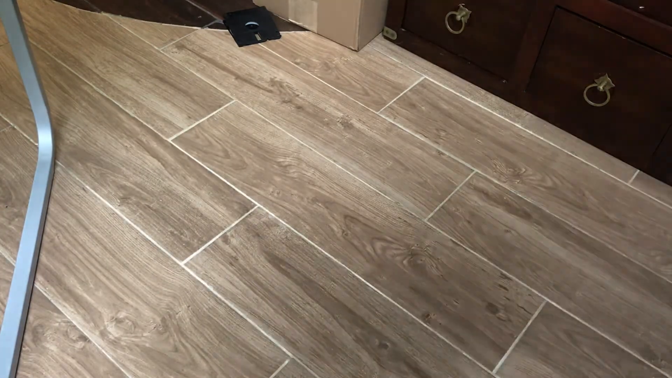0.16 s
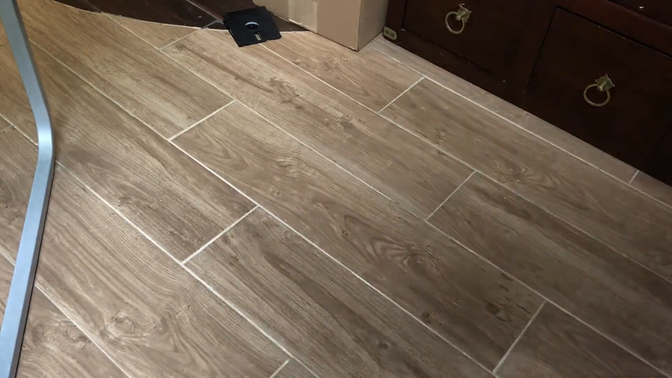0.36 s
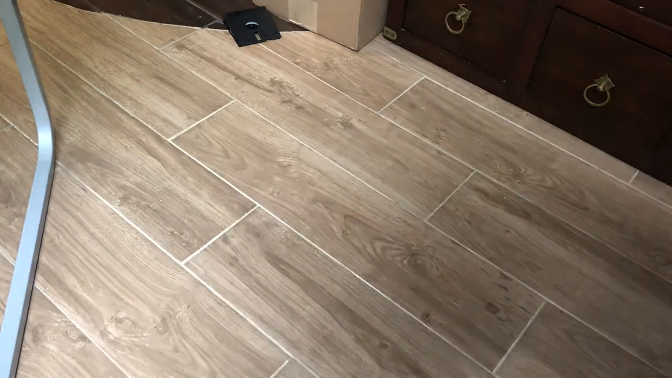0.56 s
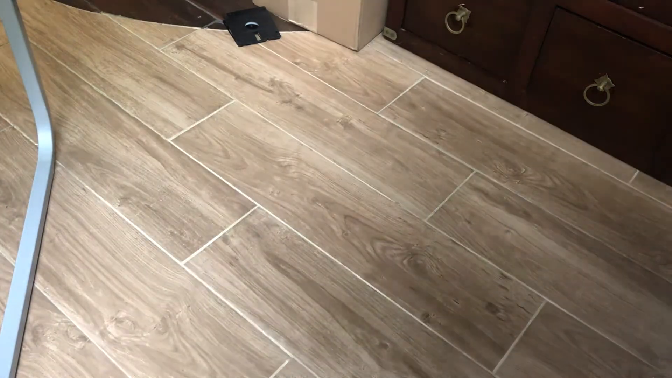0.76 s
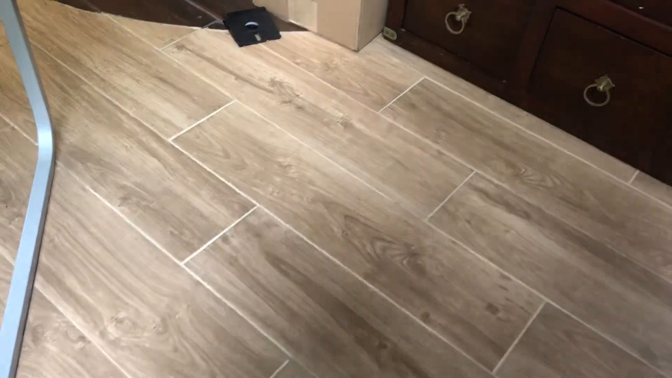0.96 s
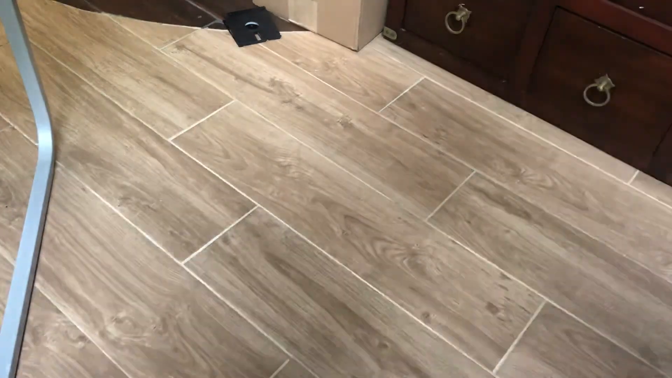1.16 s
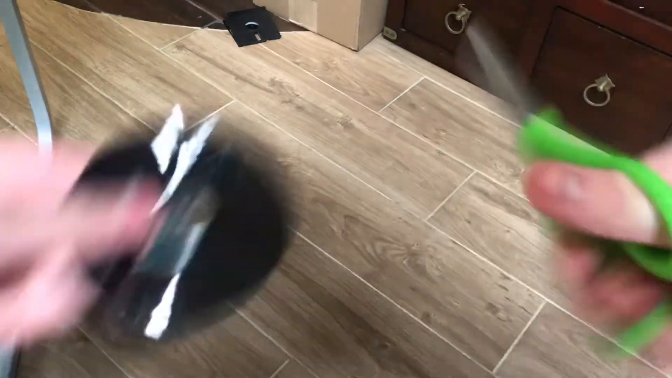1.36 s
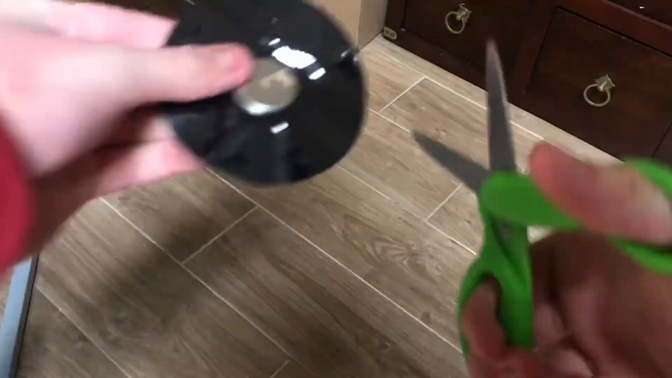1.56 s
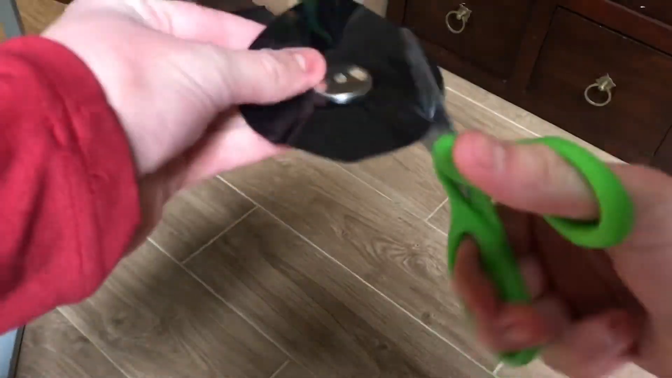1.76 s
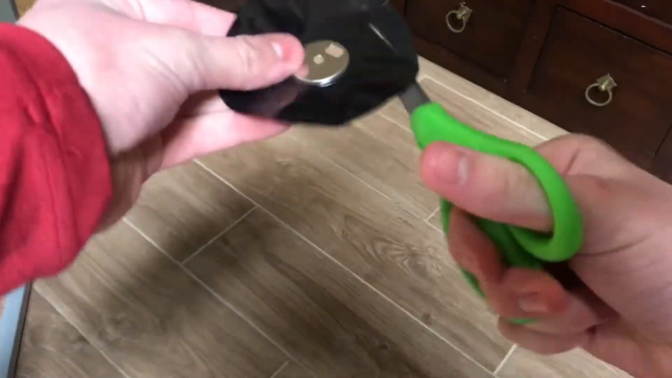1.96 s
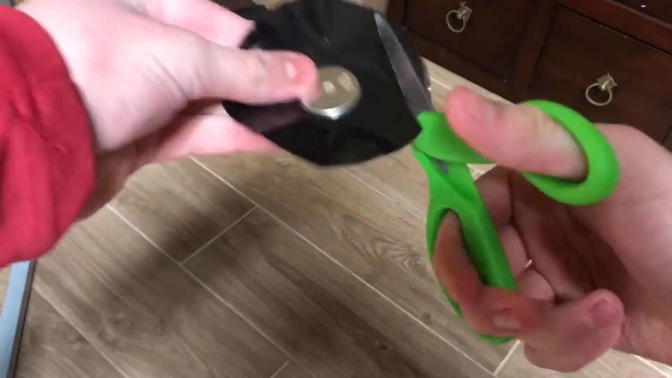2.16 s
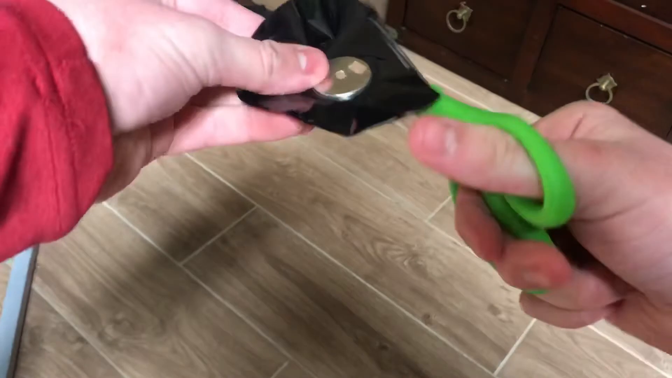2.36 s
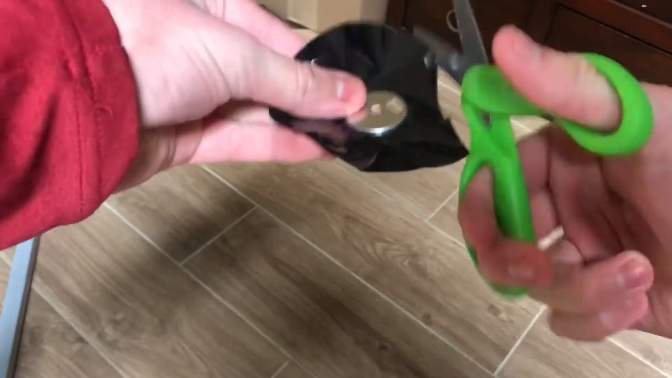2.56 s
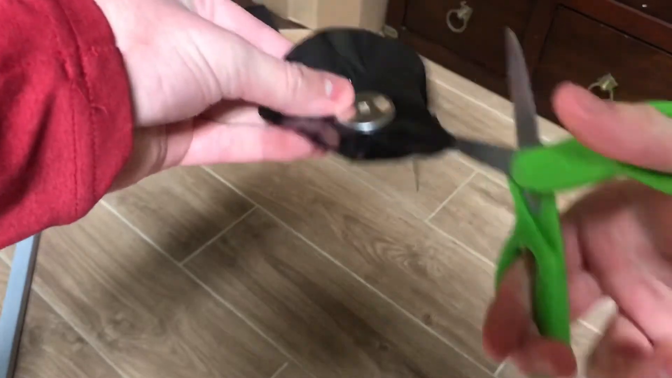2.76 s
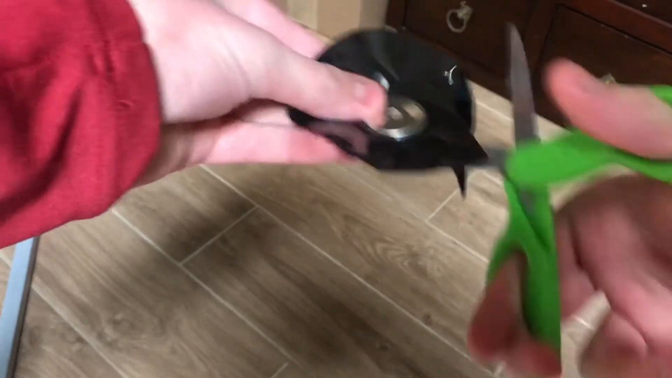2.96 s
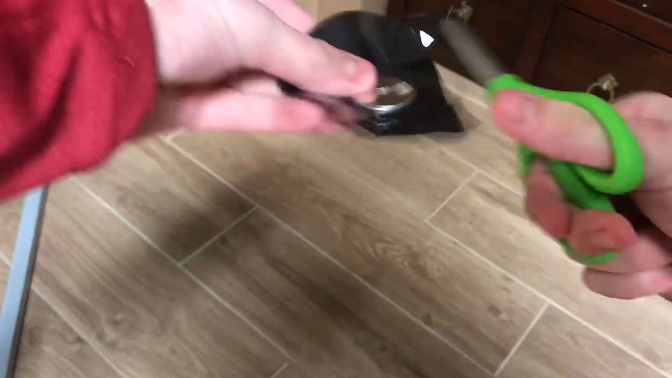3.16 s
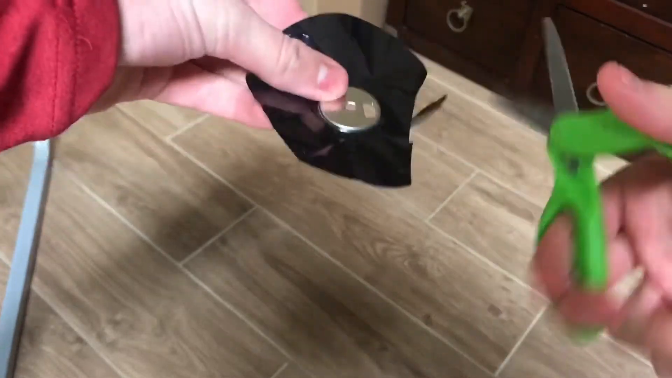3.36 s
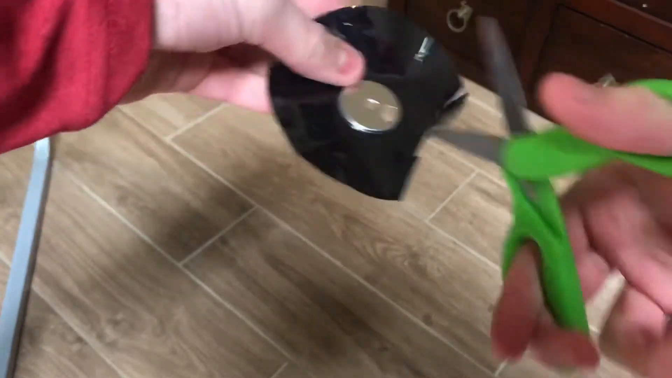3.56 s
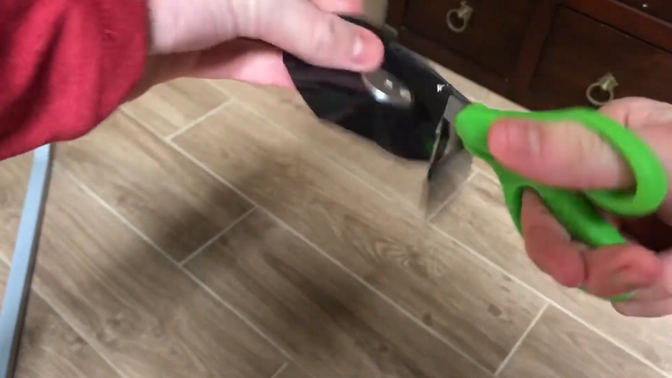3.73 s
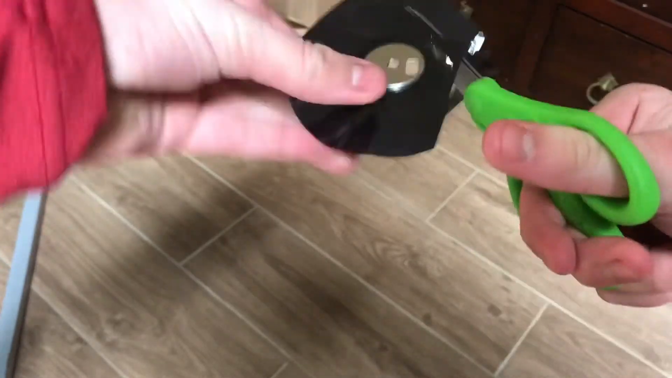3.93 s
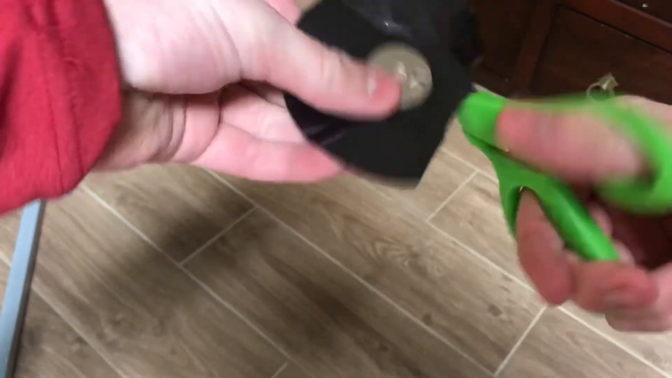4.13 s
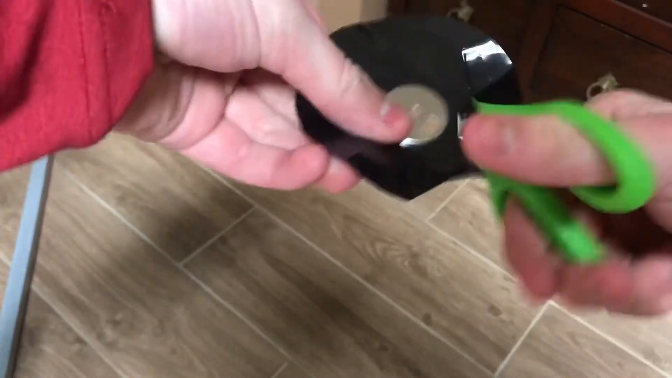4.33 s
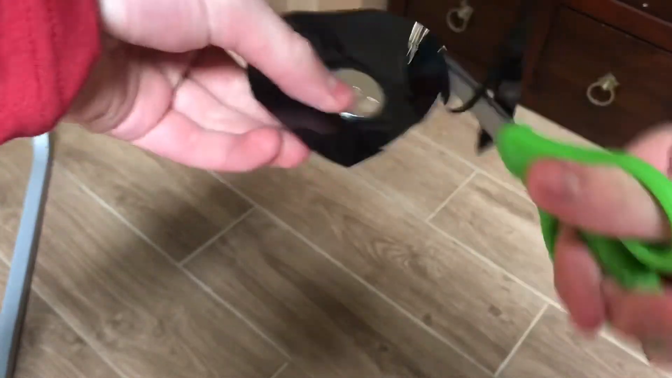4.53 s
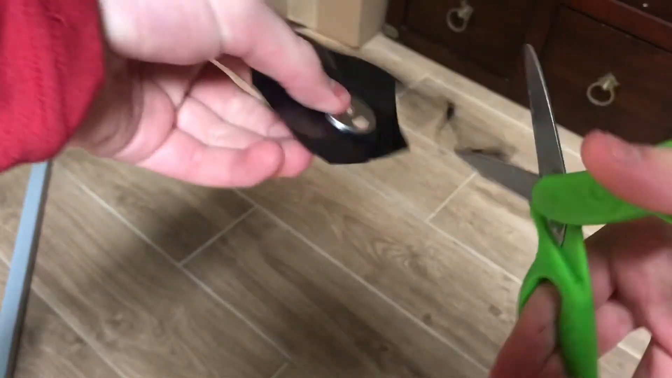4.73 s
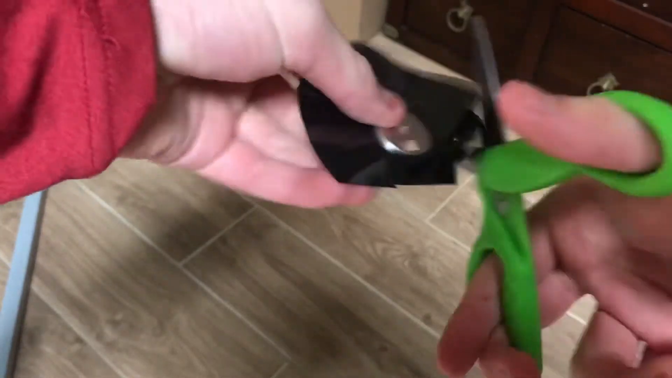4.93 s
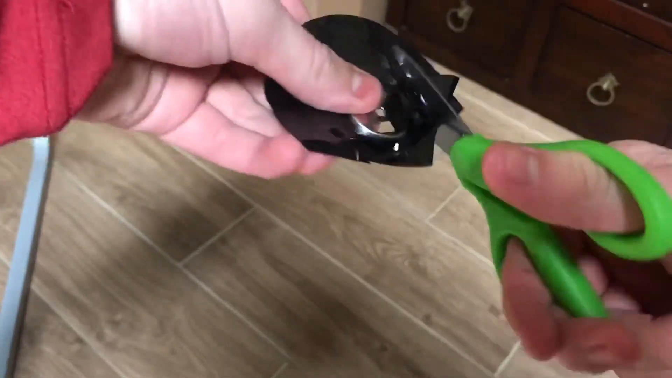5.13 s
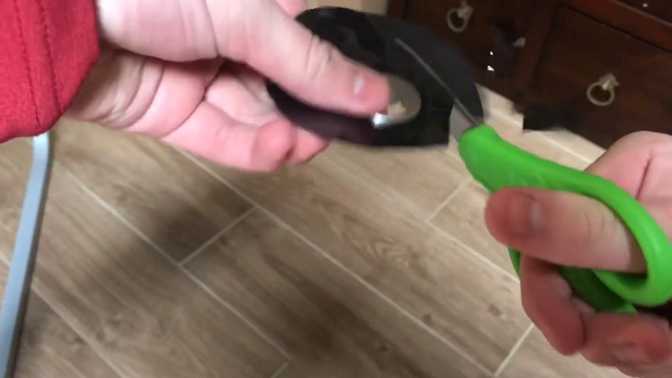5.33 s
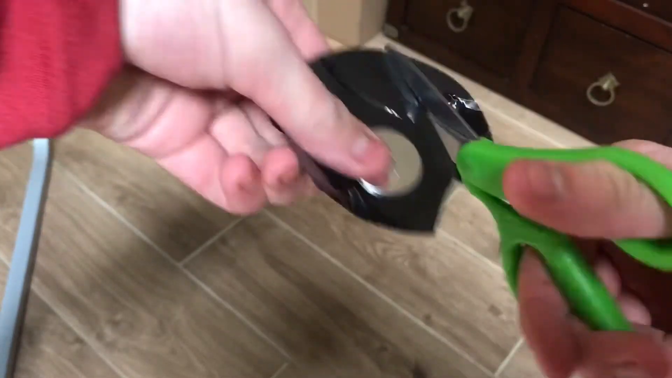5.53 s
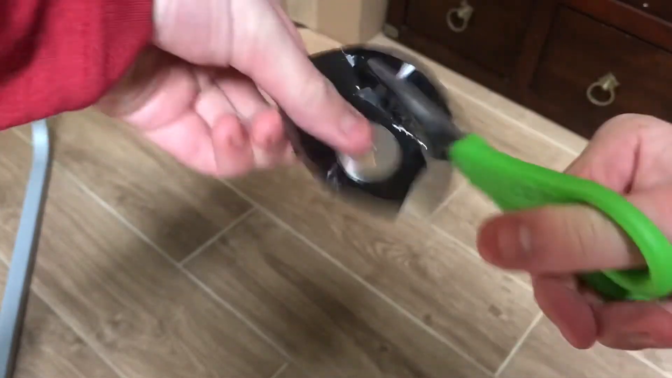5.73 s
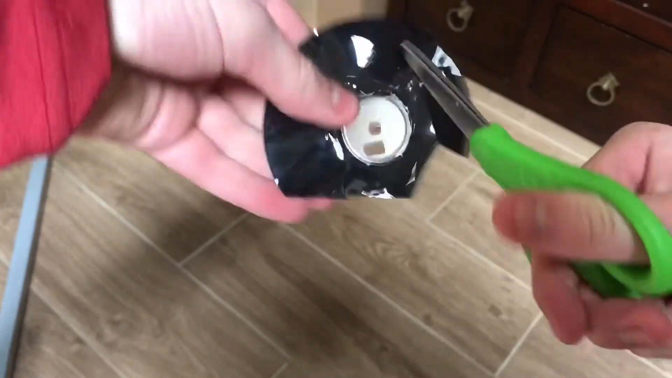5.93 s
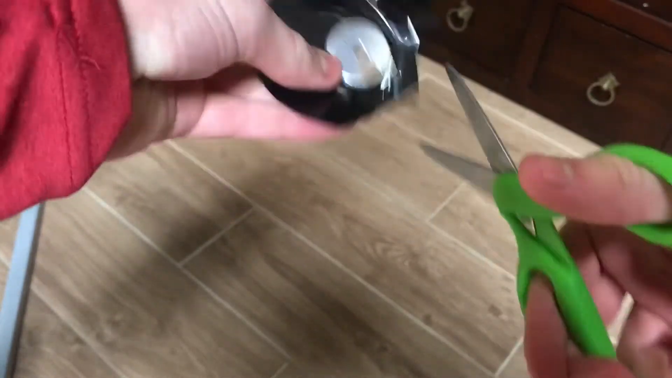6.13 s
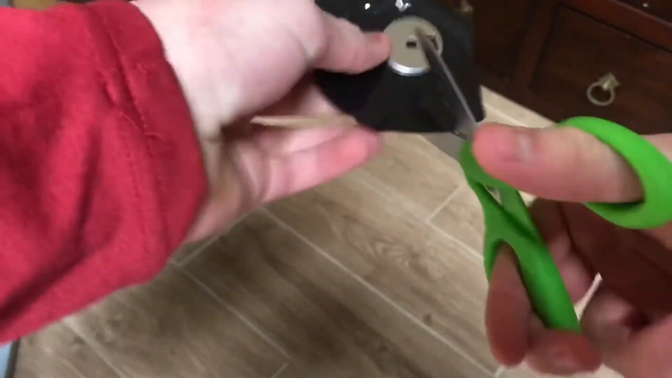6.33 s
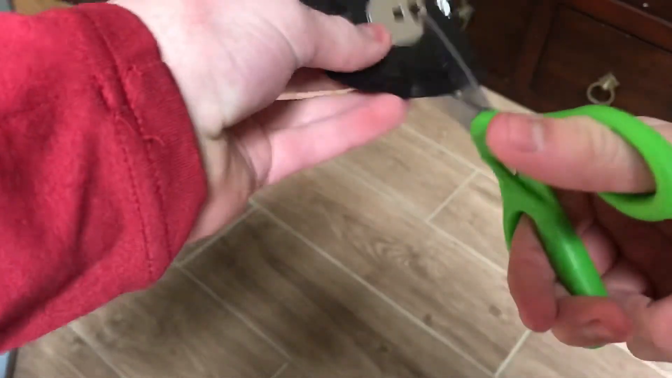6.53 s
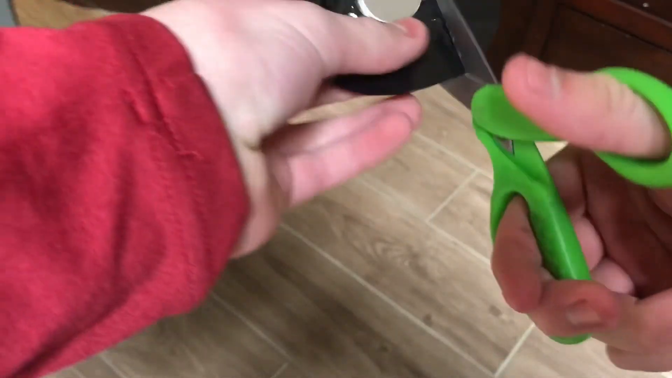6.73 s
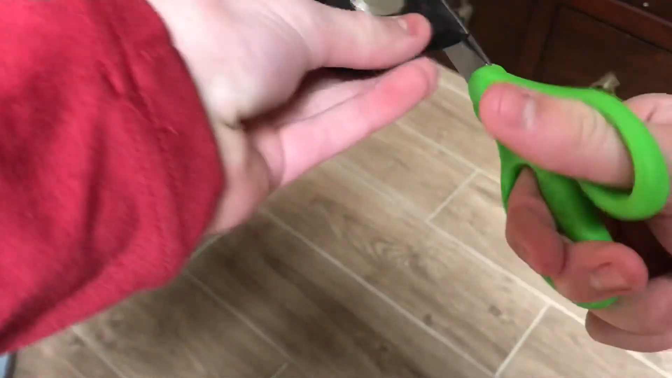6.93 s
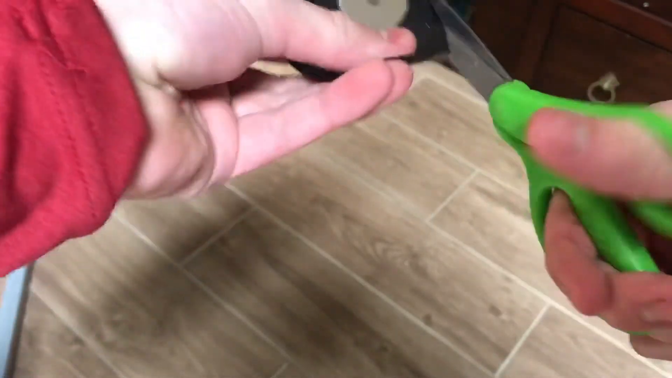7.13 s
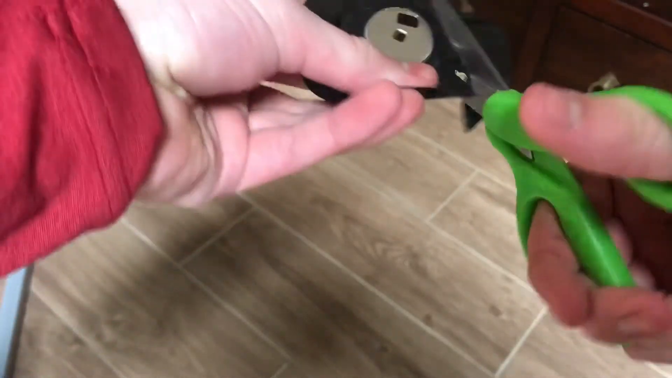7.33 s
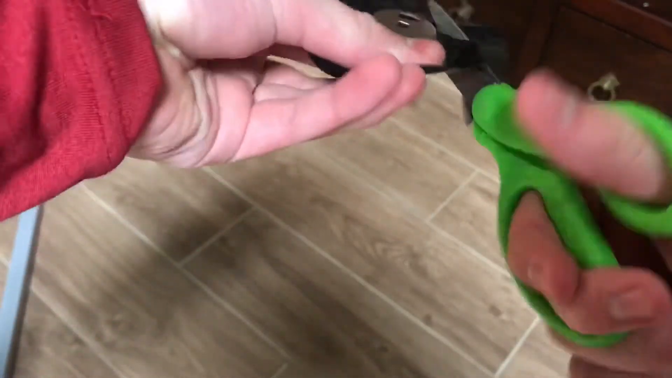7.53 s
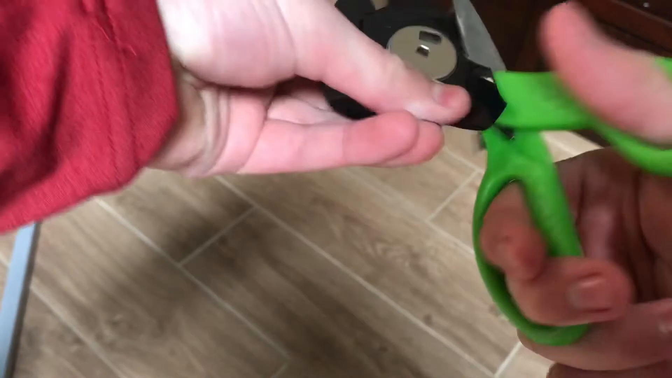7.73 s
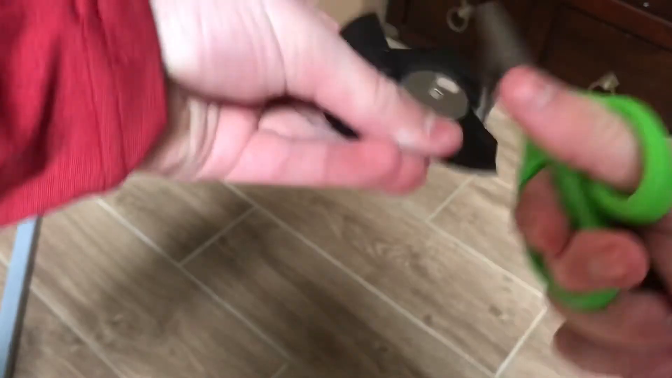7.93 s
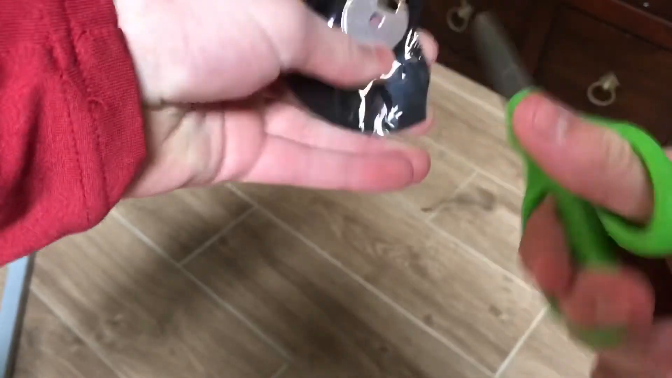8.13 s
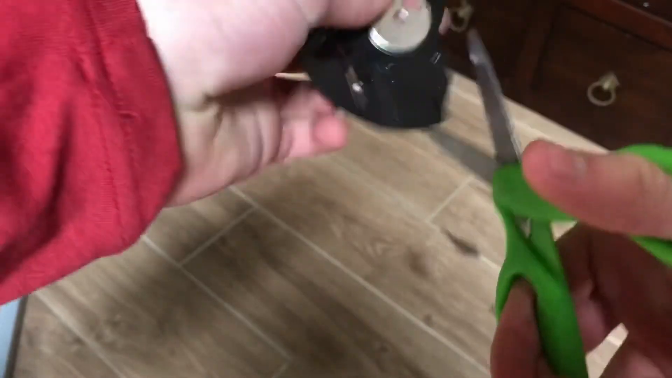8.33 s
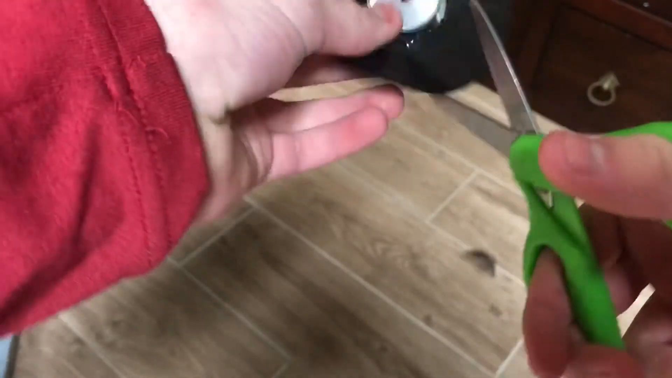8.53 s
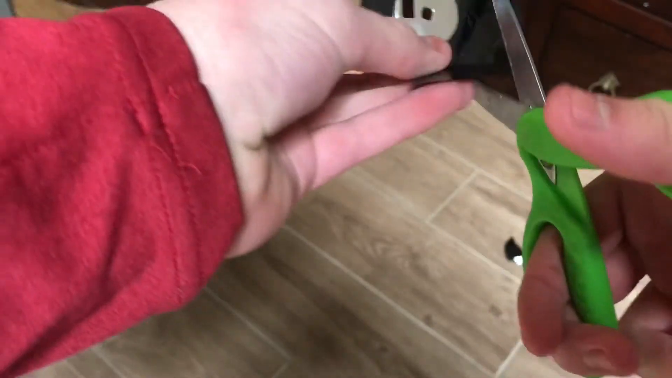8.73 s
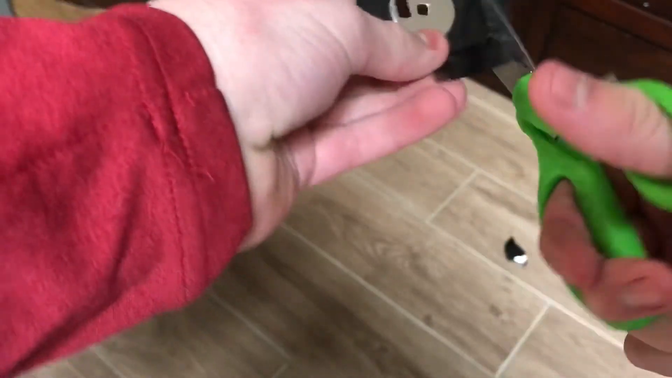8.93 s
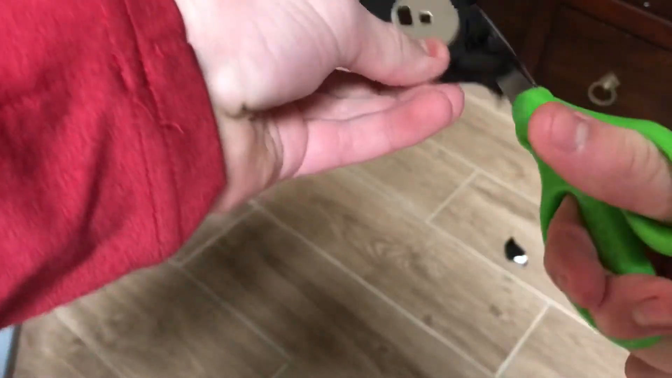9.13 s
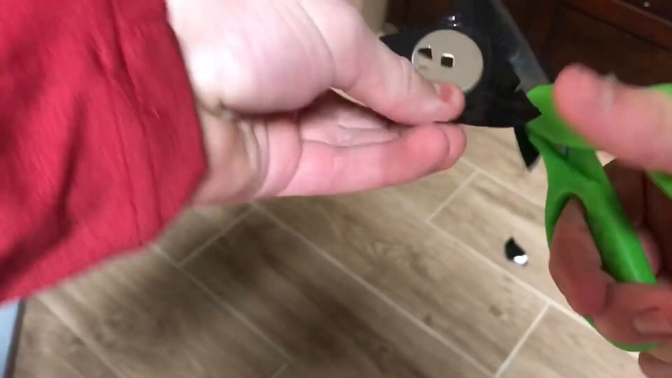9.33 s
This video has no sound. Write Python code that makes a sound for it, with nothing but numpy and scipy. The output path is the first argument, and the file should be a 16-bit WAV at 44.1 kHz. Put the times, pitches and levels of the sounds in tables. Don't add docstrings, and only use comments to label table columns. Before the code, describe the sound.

After a quiet second of faint hum and handle bumps, blades cut stiff plastic film in sharp, bright, crackling bursts with light rustle between.

```python
import sys
import numpy as np
from scipy import signal
from scipy.fft import rfft, irfft, next_fast_len
from scipy.io import wavfile
from scipy.ndimage import uniform_filter1d

SR = 44100
rng = np.random.default_rng(int(sys.argv[2]) if len(sys.argv) > 2 else 0)


def generate_wav(signal):
    frames = np.transpose(np.atleast_2d(signal))
    scaled = np.clip(frames, -1, 1) * 32767
    pcm = np.round(scaled).astype(np.int16)
    wavfile.write(sys.argv[1], SR, pcm)


def linear_from_db(decibels):
    return 10 ** (np.asarray(decibels, float) / 20)


N = 418068


def rms_one(x):
    return x / np.sqrt(np.mean(x ** 2) + 1e-20)


def at_hz(points, hz):
    table_hz, value = np.array(points).T
    return np.interp(np.log(hz), np.log(table_hz), value)


def band(x, low_hz, high_hz):
    gain = np.sqrt(SR / 2 / (high_hz - low_hz))
    sos = signal.butter(2, [low_hz, high_hz], "band", fs=SR, output="sos")
    return gain * signal.sosfilt(sos, x + 1e-18)


def coloured(x, points):
    size = next_fast_len(N)
    hz = np.maximum(np.arange(size // 2 + 1) * SR / size, 10)
    return irfft(rfft(x, size) * linear_from_db(at_hz(points, hz)), size)[:N]


def drift(rate_hz):
    knots = rng.standard_normal(4002)
    return np.interp(np.arange(N) / SR * rate_hz, np.arange(len(knots)), knots)


def ring(x, hz, width_hz):
    r = np.exp(-np.pi * width_hz / SR)
    push = np.array([1, 0, -1]) * np.sqrt((1 - r * r) / 2)
    return signal.lfilter(push, [1, -2 * r * np.cos(2 * np.pi * hz / SR), r * r], x)


def add(track, at, piece):
    end = min(len(track), at + len(piece))
    track[at:end] += piece[:end - at]


def crackle(size, spread_db):
    sizes_db = spread_db * np.minimum(rng.exponential(1, size), 4)
    return rms_one(rng.standard_normal(size) * linear_from_db(sizes_db))


def even(piece):
    spectrum = rfft(piece)
    humps = uniform_filter1d(np.abs(spectrum) ** 2, size=24) + 1e-30
    flat = irfft(spectrum * humps ** -.35)
    return flat * np.sqrt(np.sum(piece ** 2) / np.sum(flat ** 2))


def breaks():
    # start_s, flap_db, crack_db, spit_db
    snap_rows = [(1.3657, -26, -32, -47), (1.4, -18, -27.5, -33), (1.546, -30.5, -32, -38.5),
                 (1.75, -23.5, -39, -47), (1.795, -44, -17.5, -19.5), (1.805, -21.5, -61, -42.5),
                 (1.977, -31, -35, -43.5), (2.0476, -29, -30, -43), (2.07, -21.5, -16.5, -16.5),
                 (2.143, -27, -54, -25), (2.219, -33, -34, -22.5), (2.2681, -24.5, -23, -15.5),
                 (2.8127, -39.5, -36, -33), (3.0694, -19.5, -16.5, -15.5), (3.1338, -32, -24, -20.5),
                 (3.194, -25.5, -20, -14.5), (3.229, -25.5, -27, -30), (3.643, -34, -29.5, -42),
                 (4.9545, -34, -27.5, -26.5), (4.964, -57, -51, -28), (5.4671, -27, -26, -16.5),
                 (5.7253, -21.5, -17, -20), (5.8391, -29.5, -24, -24), (5.867, -36, -36.5, -44),
                 (6.631, -28.5, -24, -25), (6.8705, -21.5, -19.5, -14.5), (6.914, -34.5, -27.5, -20),
                 (7.8734, -23.5, -14, -15), (8.375, -29, -24.5, -32.5), (9.323, -40.5, -26.5, -28)]
    # start_s, flap_db, crack_db, spit_db
    pop_rows = [(1.266, -71, -29, -32), (1.632, -31, -29.5, -30.5), (1.8279, -13.5, -15.5, -12),
                (2.0111, -28.5, -24, -22.5), (2.0968, -29, -19, -21), (4.0502, -28.5, -33.5, -24),
                (4.1466, -24, -20, -42), (4.8015, -30, -38, -45), (5.2491, -26.5, -25.5, -40),
                (5.4824, -18, -20.5, -26), (5.549, -33.5, -32.5, -51), (5.588, -31.5, -30.5, -45),
                (5.612, -30.5, -24.5, -29), (5.629, -24, -21, -20.5), (5.771, -19, -15, -14.5),
                (5.9593, -31, -24.5, -19.5), (6.579, -32, -32, -35.5), (6.9049, -27.5, -20, -16.5),
                (6.931, -31, -29, -54), (7.0512, -51.5, -28, -32), (7.1457, -27.5, -20.5, -24),
                (7.4058, -35, -27.5, -20), (7.658, -55, -26, -32), (8.102, -23.5, -22, -22),
                (8.336, -41.5, -36.5, -35), (9.2016, -33.5, -30, -22), (9.362, -47, -32, -34),
                (9.38, -37, -28, -30)]
    # start_s, flap_db, spit_db, length_ms
    drawn_out_rows = [(1.7596, -24.5, -28, 5.6), (1.8173, -24.5, -32, 6.2), (1.855, -32, -34, 6.3),
                      (2.0785, -33.5, -53, 11), (2.4032, -33, -32.5, 7.1), (3.099, -30.5, -34.5, 4.6),
                      (3.7034, -27.5, -29.5, 9.1), (3.7341, -43, -39.5, 21), (4.14, -30, -31, 3.9),
                      (4.215, -28, -36.5, 5.3), (4.516, -35.5, -45.5, 12.2), (4.906, -32, -40, 15),
                      (4.9255, -36, -29, 7.9), (4.9395, -29.5, -28.5, 5.8), (5.066, -31.5, -47, 4.6),
                      (5.181, -25, -24, 8.1), (5.216, -29, -19.5, 11), (5.4476, -26, -27.5, 6.1),
                      (5.76, -27.5, -28, 6.4), (5.9752, -35.5, -27, 3.4), (6.844, -22.5, -23, 4),
                      (6.9779, -33, -31.5, 6.4), (7.27, -29.5, -33, 8.6), (7.623, -51, -39.5, 6.7),
                      (7.65, -47, -34.5, 5.4), (7.8323, -37, -26.5, 11), (8.3711, -21.5, -42, 3.7),
                      (8.9681, -29, -26, 5.5), (9.0015, -33.5, -24.5, 13.4), (9.473, -32, -21, 2.2),
                      (9.4775, -39, -41.5, 3.3),
                      (1.2706, -33, -64, 5.1), (1.715, -39, -50, 7.7), (2.168, -36, -44, 7.5),
                  (2.4956, -41.5, -41.5, 8), (2.6963, -49.5, -49, 13), (2.9898, -50, -38, 15),
                  (3.0116, -37, -39, 8), (3.566, -43, -42.5, 6.5), (3.762, -31.5, -45, 6.5),
                  (3.7791, -39.5, -34.5, 5.9), (4.502, -49, -42, 7), (4.111, -39, -77, 4.3),
                  (4.333, -44, -44, 13), (4.6964, -47.5, -68, 7.1), (4.7442, -39, -49, 3.3),
                  (5.148, -44.5, -39, 17), (5.6896, -41, -39, 12), (5.9352, -38.5, -43, 8.3),
                  (6.452, -47.5, -65, 8.1), (6.755, -28.5, -50, 3.1), (7.356, -45, -45, 11.3),
                  (7.7791, -39, -42.5, 4.4), (8.453, -47.5, -45, 17), (8.6591, -43, -43.5, 16),
                  (8.861, -39.5, -51, 10.4), (8.889, -46, -33, 11), (9.162, -50, -46, 22),
                  (9.407, -48.5, -40.5, 16), (9.427, -48, -42, 17)]
    # start_s, flap_db, spit_db
    tick_rows = [(0.562, -59, -54), (6.413, -51, -66), (6.49, -65, -66), (6.433, -49, -67),
                 (0.926, -54, -49), (2.043, -39, -41), (4.314, -43, -50), (8.117, -42, -65),
                 (8.183, -47, -53), (8.872, -50, -44), (8.944, -41, -54), (0.971, -45, -51),
                 (1.523, -44, -63), (1.455, -50, -49), (1.792, -19, -56), (1.962, -38.5, -73),
                 (2.2498, -41, -44), (2.273, -24, -14.5), (2.959, -49, -46), (3.364, -55, -42.5),
                 (3.4547, -35, -46), (3.4964, -37.5, -75), (3.9738, -45, -40.5), (4.021, -38, -53),
                 (4.259, -52, -46), (4.389, -45, -51), (6.109, -43, -101), (6.152, -39.5, -60.5),
                 (6.3199, -44.5, -37.5), (6.726, -39.5, -55), (6.761, -35, -96), (6.84, -25, -33),
                 (7.458, -38, -39), (7.5526, -45, -38.5), (7.613, -53, -37), (8.059, -54, -41.5),
                 (8.806, -33.5, -42.5), (8.839, -39.5, -41)]
    pop_ms, snap_ms, tick_ms = 3.08, 4.3, 4.37
    sharp = [(*row, pop_ms) for row in pop_rows] + [(*row, snap_ms) for row in snap_rows]
    folds = drawn_out_rows + [(*row, tick_ms) for row in tick_rows]
    return sharp + [(s, flap, (flap + spit) / 2 + 1.78, spit, ms) for s, flap, spit, ms in folds]


def snaps():
    flap, crack, spit = np.zeros((3, N))
    t = np.arange(2048) / SR - .006
    lead_s = .0059
    for s, flap_db, crack_db, spit_db, ms in breaks():
        length = max(ms - 1.2, .4) / 1000
        slow = np.clip((ms - 3.) / 10.0, 0, 1.5)
        creak = linear_from_db(-42.5 + 9.2 * slow) * np.clip(1 + t / 0.023, 0, 1) ** 2
        rise = creak + np.clip(t / (0.00017 + 0.45 * slow * length), 0, 1) ** 1.37
        accent_db = 4.64 * np.exp(-np.abs(t - .0003) / 0.00029) - 3.5
        rise *= linear_from_db(accent_db * np.clip(1 - slow, 0, 1))
        stutter = linear_from_db(3.24 * np.repeat(rng.standard_normal(64), 32))
        cracks = crackle(len(t), spread_db=1.0) * stutter
        after = np.maximum(t, 0) / length
        weight = rise * linear_from_db(-9. * after)
        burst = cracks * rise * np.sqrt(np.sum(weight ** 2) / np.sum((weight * cracks) ** 2))
        at = round((s - lead_s) * SR)
        add(flap, at, burst * linear_from_db(flap_db + 4.0 - 4.84 * after))
        add(crack, at, even(burst * linear_from_db(crack_db + 8.0 - 8.08 * after)))
        bright_db = 1.8 * np.exp(-4. * after)
        add(spit, at, even(burst * linear_from_db(spit_db + 6.5 - 10. * after + bright_db)))
    low = band(flap, 471, 2070) - linear_from_db(-4.5) * band(flap, 170, 337)
    return low + band(crack, 2650, 5870) + band(spit, 8620, 14070)


def handling():
    # start_s, rustle_db, hiss_db, fall_db_per_s
    jolt_rows = [(1.272, -54, -56, 57), (1.402, -41, -46, 112), (1.8, -25.5, -34, 141),
                 (2.278, -27, -33, 112), (3.075, -29.5, -42, 89), (3.57, -45, -54, 19),
                 (5.156, -31, -39.5, 72), (5.454, -40.5, -46, 126), (5.962, -44, -50, 121),
                 (6.313, -52, -42.5, 163), (6.847, -51, -36, 95), (7.15, -40, -56, 43),
                 (7.41, -47, -50, 88), (7.841, -40, -36.5, 120), (8.102, -39, -43, 216),
                 (8.373, -48, -45.5, 39), (8.666, -40.5, -56, 27), (9.203, -31, -40, 164)]
    # peak_s, rustle_db, hiss_db, rise_db_per_s, fall_db_per_s
    squeeze_rows = [(0.949, -47, -47, 218, 92), (1.678, -49, -43, 353, 250), (2.085, -40.5, -44, 120, 49.7),
                    (2.705, -51, -55, 70, 243), (3.005, -41, -42, 203, 150), (3.724, -36, -42, 160, 104),
                    (4.153, -34, -51, 68, 70.4), (4.526, -42.5, -52, 92, 230),
                    (4.7, -46.5, -54.5, 24.7, 22), (4.937, -31.5, -34, 374, 164),
                    (5.04, -42, -47.5, 90, 65), (5.232, -33, -42, 180, 142), (5.771, -37, -42.5, 38.2, 180),
                    (6.45, -51.5, -68, 150, 160), (6.643, -47, -56.5, 50, 160),
                    (6.916, -38.5, -37.5, 177, 81), (7.283, -39, -54, 39.8, 400),
                    (7.671, -42, -52, 63.7, 124), (9.016, -37, -48, 45.7, 159), (9.379, -44, -48, 130, 148)]
    jolt_rise_db_per_s, hiss_falls_faster = 806.5, 1.42
    held_from_s, held_rustle_db, held_hiss_db = 0.34, -65.5, -68.5
    rows = [(s, low, high, jolt_rise_db_per_s, fall) for s, low, high, fall in jolt_rows] + squeeze_rows
    s, low_db, high_db, rise, fall = np.transpose(rows)[:, :, None]
    t = np.arange(0, N + 64, 64) / SR
    before, after = np.maximum(s - t, 0), np.maximum(t - s, 0)
    held = t > held_from_s
    low = linear_from_db(low_db - rise * before - fall * after).max(axis=0)
    high = linear_from_db(high_db - rise * before - hiss_falls_faster * fall * after).max(axis=0)
    low = np.maximum(low, linear_from_db(held_rustle_db) * held)
    high = np.maximum(high, linear_from_db(held_hiss_db) * held)
    return [np.interp(np.arange(N) / SR, t, level) for level in (low, high)]


def creases(per_s, hold):
    happens = rng.random(N) < per_s * linear_from_db(5. * drift(30.)) / SR
    clicks = np.clip(crackle(N, spread_db=1.5), -1.3, 1.3) * happens
    return clicks, rms_one(signal.lfilter([1], [1, -hold], np.abs(clicks)))


def rustle():
    rustle_level, hiss_level = handling()
    clicks, puffs = creases(per_s=550., hold=.985)
    clicked_patch, rub = rng.integers(0, 12, N), rng.standard_normal(N)
    pitches = np.outer([908, 1293, 1890, 3030, 4120, 5500], [1, 1.14]).ravel()
    flecks = np.zeros(N)
    for k, hz in enumerate(pitches):
        push = rms_one(clicks) * (clicked_patch == k) + .09 * rub * linear_from_db(6. * drift(28.))
        flecks += ring(push, hz, hz / 12.)
    scrape = band(rng.standard_normal(N) * (0.073 + 0.77 * puffs), 1300, 6000)
    sheet = 0.5 * scrape + 0.74 * rms_one(flecks)
    sheet *= linear_from_db(4. * drift(30.))
    own_puffs = creases(per_s=490.0, hold=0.9)[1]
    hiss = rng.standard_normal(N) * (0.5 + 0.51 * puffs + 0.32 * own_puffs) * linear_from_db(7.5 * drift(22.))
    hiss = band(hiss, 6000, 18500)
    return sheet * rustle_level * linear_from_db(-5.0) + hiss * hiss_level * linear_from_db(-2.5)


def film():
    # pitch_hz, level_db
    film_colour = [(300, -21.5), (700, -11), (1200, -4), (2500, 1), (5000, -5), (8000, 1), (10500, -5.5),
                   (16000, -3)]
    return coloured(snaps() + rustle(), film_colour)


def knocks(rows, t60, rough, sag):
    out, t = np.zeros(N), np.arange(16384) / SR
    for s, db, hz in rows:
        shaken = rough * rms_one(ring(rng.standard_normal(len(t)), hz, hz * 1.2))
        swell = 1 - np.exp(-t * hz / .3)
        tone = np.sin(2 * np.pi * hz * t * (1 - sag * t))
        add(out, round(s * SR), linear_from_db(db + 2.5 - 60 * t / t60) * swell * (tone + shaken))
    return out


def flaps():
    # start_s, peak_db, pitch_hz
    flap_rows = [(1.365, -22, 1860), (1.978, -33, 850), (2.097, -22.5, 1660), (3.194, -26.5, 1350),
                 (3.706, -25, 1060), (3.761, -41, 1780), (4.084, -36, 1710), (6.585, -37.5, 794),
                 (6.844, -22, 2030), (8.101, -34, 1705), (9.323, -25.5, 1700)]
    return linear_from_db(2.0) * knocks(flap_rows, t60=0.027, rough=0.041, sag=0.24)


def chips(rows, width, t60, wide):
    out, t = np.zeros(N), np.arange(1024) / SR
    for s, db, hz in rows:
        push = rng.standard_normal(len(t)) * linear_from_db(-60 * t / t60)
        rung = ring(ring(push, hz, hz * width), hz, hz * width)
        bare = band(push, 900, 15000)
        add(out, round(s * SR), linear_from_db(db) * (rung / np.abs(rung).max() + wide * bare / np.abs(bare).max()))
    return out


def small_creases():
    # start_s, peak_db, pitch_hz
    crease_rows = [(1.2723, -28, 2860), (1.3344, -39, 2950), (1.429, -33, 3680), (6.835, -35, 6000),
                   (1.6625, -50, 6830), (1.7956, -14.5, 2550), (1.801, -31, 8250), (1.8063, -13.5, 2820),
                   (1.9082, -40, 7000), (1.9271, -49, 1770), (2.0839, -19.5, 8890), (2.1623, -27, 1570),
                   (2.3518, -38, 3770), (2.7445, -41, 6600), (2.9235, -43, 5170), (2.9945, -34, 2000),
                   (3.0421, -36, 3380), (3.4382, -45, 6460), (3.611, -46, 8440), (3.6381, -32, 1810),
                   (3.6988, -35, 4130), (3.7608, -26, 1680), (3.8788, -41.5, 8530), (4.0259, -41, 2110),
                   (4.0723, -34.5, 1990), (4.2605, -41, 1590), (4.3483, -29, 11990), (4.5339, -27, 10300),
                   (4.6261, -41.5, 5430), (4.641, -42.5, 2900), (4.918, -28, 11460), (5.1498, -29, 1960),
                   (4.7935, -44, 8560), (5.2619, -38, 9580), (5.3229, -40, 9190), (5.3542, -44, 11370),
                   (5.0105, -38, 9000), (5.603, -31, 3660), (5.7265, -15.5, 7100), (6.0595, -47, 8510),
                   (6.0765, -42.5, 1720), (6.5477, -48, 3400), (7.159, -30, 2600), (8.021, -48, 10000),
                   (7.5225, -46, 9300), (7.5299, -35, 2900), (7.6224, -23.5, 3060), (7.6515, -27, 5470),
                   (7.7696, -40, 7400), (8.0915, -36, 7000), (8.5786, -46, 8080), (8.5859, -41, 7000),
                   (9.2975, -40, 6240), (9.3145, -51, 8000), (8.7016, -32, 3040), (8.7891, -41, 5360),
                   (8.9279, -37, 8310), (9.1116, -37, 2880), (9.1825, -28, 5500), (9.4577, -42, 10900)]
    # start_s, peak_db, pitch_hz
    body_rows = [(1.2717, -30, 1890), (1.3662, -28, 4900), (1.431, -48, 1280), (1.5461, -21.5, 6300),
                 (1.7595, -23, 1250), (1.7746, -40, 1270), (1.9622, -39, 3700), (2.0427, -30, 4240),
                 (2.0114, -21.5, 4330), (2.1998, -37, 1260), (2.2725, -40, 1040), (2.3524, -37, 1140),
                 (2.3889, -53, 1080), (2.953, -38, 7210), (3.1934, -12, 6830), (3.725, -29, 1140),
                 (3.7406, -34, 1400), (3.7473, -30, 1190), (4.1111, -36, 2300), (5.2418, -30.5, 1340),
                 (5.4897, -31, 1100), (5.6017, -41, 1510), (5.6217, -34, 1570), (6.9198, -29, 1630),
                 (7.8735, -16, 3230), (8.3644, -45, 5770), (8.6951, -35, 3100), (9.0525, -45, 1130)]
    single = chips(crease_rows, width=0.8, t60=0.019, wide=0.55)
    return single + chips(body_rows, width=0.2, t60=0.016, wide=0.068)


def freed_patches():
    # start_s, peak_db, pitch_hz
    patch_rows = [(1.519, -40, 835), (8.8395, -37, 5500), (1.7502, -20.5, 4500), (1.7607, -30, 4400),
                  (1.7953, -12.5, 8600), (1.8058, -30, 1760), (3.3224, -45, 2200), (9.4778, -11.5, 4230),
                  (1.8078, -28, 7260), (1.8281, -9.5, 6700), (1.8287, -12.5, 4430), (1.9776, -28.5, 3000),
                  (2.0706, -6.5, 8800), (2.0718, -20, 9710), (4.0497, -20.5, 3930), (3.0754, -20, 2940),
                  (2.2684, -19, 5960), (3.3635, -41.5, 2040), (3.7371, -23, 3270), (4.1476, -21.5, 9000),
                  (3.877, -40, 2690), (4.9416, -23.5, 1800), (5.0674, -28, 3700), (4.926, -29, 12500),
                  (5.1852, -23, 4110), (5.2194, -22.5, 1830), (5.2205, -15.5, 5500), (5.4679, -16.5, 3880),
                  (5.5883, -30, 2840), (5.6293, -13.5, 2990), (5.6295, -14.5, 4340), (5.6302, -16, 6000),
                  (5.6612, -34, 3040), (5.7252, -23, 3300), (5.7258, -11, 6800), (4.389, -35, 4000),
                  (5.77, -10.5, 6460), (5.772, -24, 8350), (5.8399, -17, 4200), (6.6329, -20.5, 6100),
                  (6.8449, -28, 6960), (6.845, -20, 2930), (6.8452, -15.5, 8360), (6.8468, -16, 5840),
                  (6.9053, -21, 6600), (6.9054, -18, 7700), (6.9142, -17, 7000), (6.9795, -19.5, 3080),
                  (7.0515, -21, 2880), (9.0144, -25.5, 3070), (7.779, -32, 2200), (7.8737, -11.5, 6400),
                  (8.1015, -21.5, 4500), (8.1015, -13, 7600), (9.0072, -16, 8470), (9.2017, -19, 5070),
                  (9.3821, -15, 5360), (9.432, -29, 4460)]
    return chips(patch_rows, width=0.28, t60=0.013, wide=0.065)


def blades(x):
    # pitch_hz, level_db
    steel_modes = [(1352, -32), (1760, -32.5), (2755, -31), (3255, -31)]
    return sum(linear_from_db(db) * ring(x + 1e-18, hz, width_hz=9.6) for hz, db in steel_modes)


def handles():
    # start_s, peak_db, pitch_hz
    handle_rows = [(0.592, -37, 147), (0.619, -33.5, 122), (0.655, -39, 75), (0.885, -35.5, 284),
                   (0.887, -33.5, 117), (0.919, -30, 54.7), (0.948, -40.5, 232), (1.792, -42, 181),
                   (2.069, -49, 190), (2.268, -40.5, 153), (4.144, -37.5, 134), (5.219, -41.5, 300),
                   (5.77, -33.5, 264), (6.629, -44, 280), (8.372, -52, 173)]
    picked_up = knocks(handle_rows[:7], t60=0.084, rough=0.14, sag=0.27)
    return picked_up + knocks(handle_rows[7:], t60=0.055, rough=0.99, sag=0.4)


def room(x):
    # pitch_hz, t60_s
    room_decay = [(500, 0.49), (1400, 0.28), (3500, 0.32), (9000, 0.13), (15000, 0.27)]
    t = np.arange(16384) / SR
    edges = 350 * 2. ** np.arange(0, 6, .5)
    tail = np.zeros(len(t))
    for low, high in zip(edges, edges[1:]):
        t60 = at_hz(room_decay, np.sqrt(low * high))
        noise = band(rng.standard_normal(len(t)), low, high) * np.sqrt(high - low)
        tail += noise * linear_from_db(-60 * t / t60)
    tail *= np.clip((t - .002) / 0.00038, 0, 1)
    return signal.fftconvolve(x, tail / np.sqrt(np.sum(tail ** 2)))[:N]


def footfalls():
    # start_s, peak_db
    step_rows = [(1.394, -51.5), (2.375, -53.5), (2.929, -54.5), (3.347, -48.5), (3.822, -45.5),
                 (4.31, -47), (4.77, -46.5), (5.27, -52), (5.78, -51), (6.223, -52), (6.698, -54.5),
                 (7.244, -55), (7.665, -51), (8.652, -46), (8.731, -42.5), (9.197, -52)]
    floor_hz = 52.8
    return knocks([(*row, floor_hz) for row in step_rows], t60=0.63, rough=0.25, sag=0.66)


def house():
    # pitch_hz, level_db per Hz
    hum_colour = [(20, -14), (59, -1), (161, -9), (206, -0.5), (354, -11), (796, -20), (2410, -24),
                  (16000, -38.5)]
    hum = rms_one(coloured(rng.standard_normal(N), hum_colour))
    return linear_from_db(-60.5) * hum * linear_from_db(0.4 * drift(14.0))


def scene():
    disk = film() + flaps() + small_creases()
    patches = freed_patches()
    close = disk + patches + blades(disk)
    echo = linear_from_db(-15) * room(disk + linear_from_db(-3.5) * patches)
    return (close + echo + handles() + footfalls() + house())[None]


def top_cut(x):
    return signal.sosfilt(signal.butter(12, 16990, fs=SR, output="sos"), x)


def record(dry):
    low_pass = signal.cheby2(14, 70, 16900, fs=SR, output="sos")
    mix = signal.sosfilt(low_pass, np.clip(dry, -1, 1))
    return top_cut(np.clip(mix, -1, 1))


dry = scene()
out = record(dry)
generate_wav(out)
```